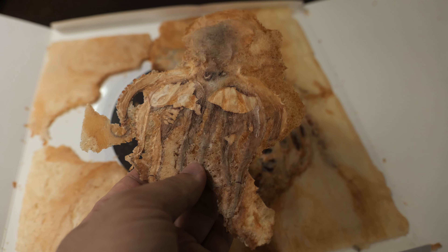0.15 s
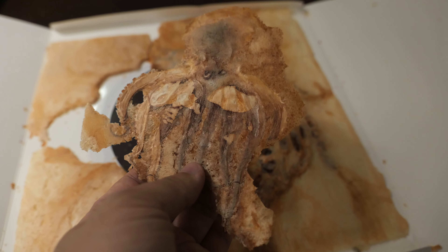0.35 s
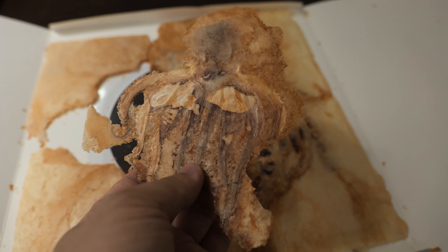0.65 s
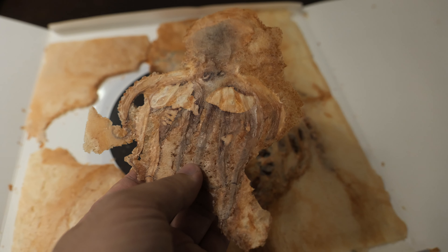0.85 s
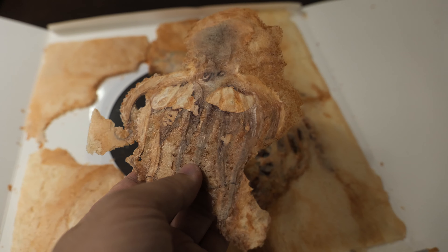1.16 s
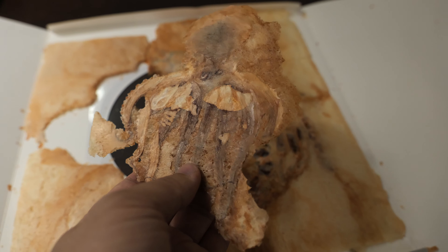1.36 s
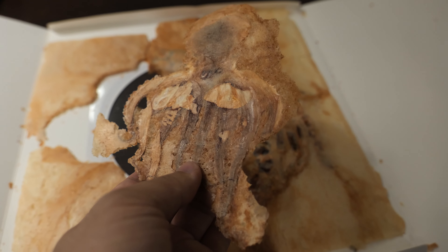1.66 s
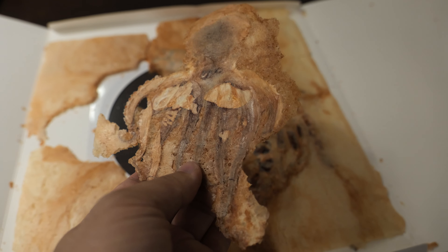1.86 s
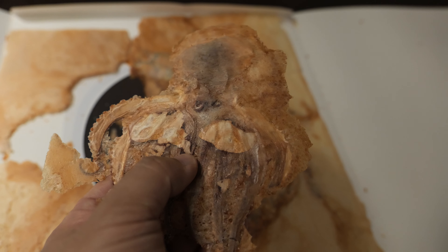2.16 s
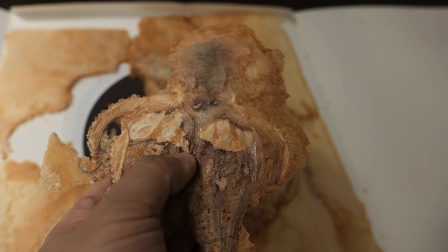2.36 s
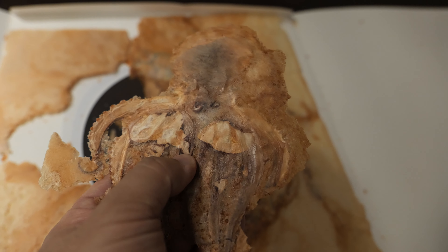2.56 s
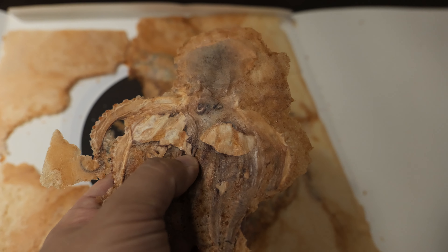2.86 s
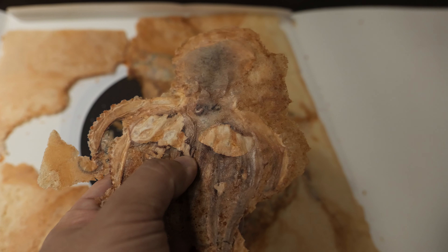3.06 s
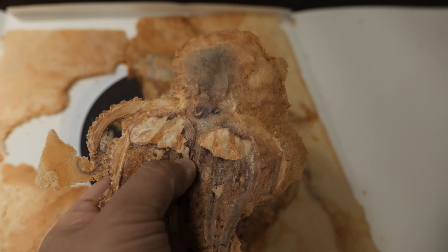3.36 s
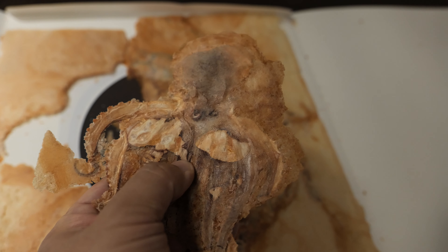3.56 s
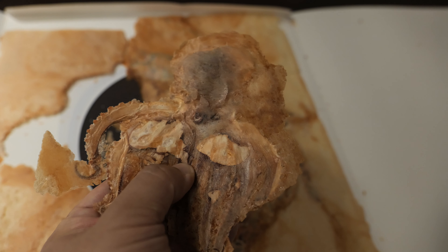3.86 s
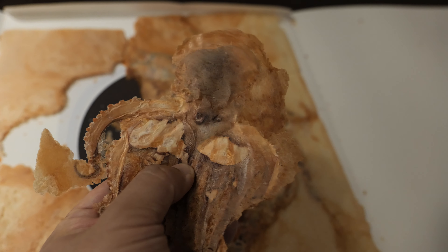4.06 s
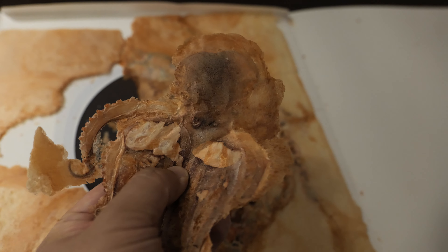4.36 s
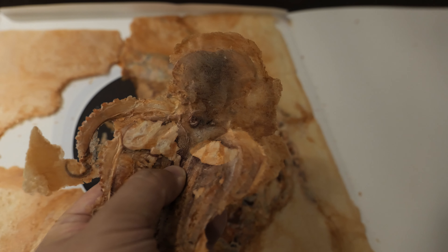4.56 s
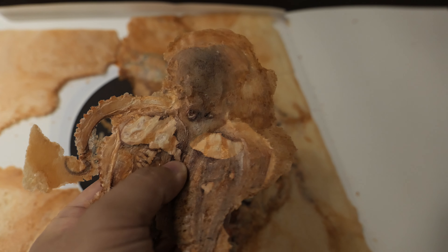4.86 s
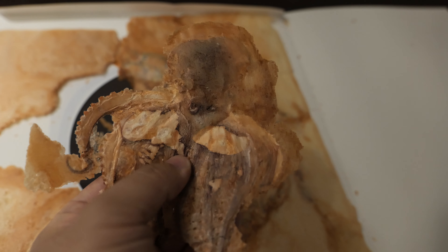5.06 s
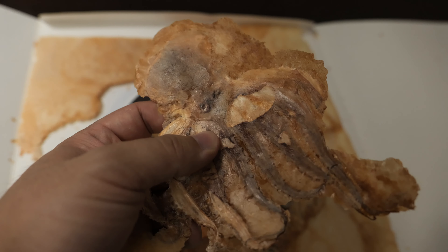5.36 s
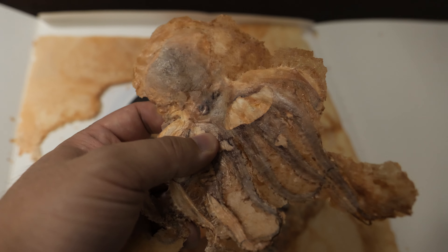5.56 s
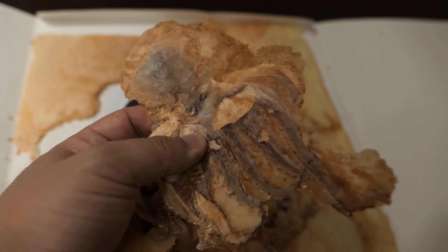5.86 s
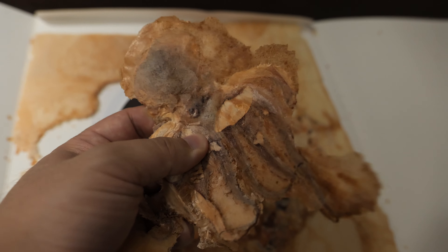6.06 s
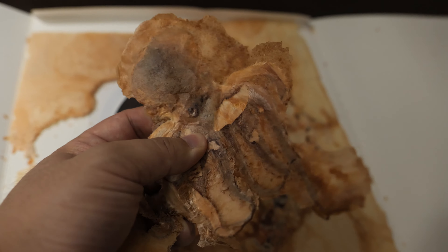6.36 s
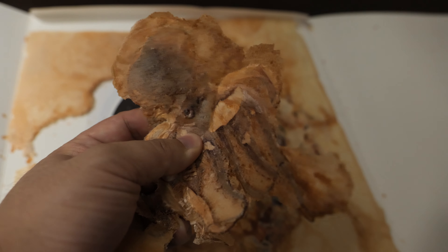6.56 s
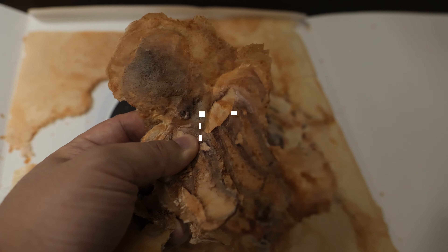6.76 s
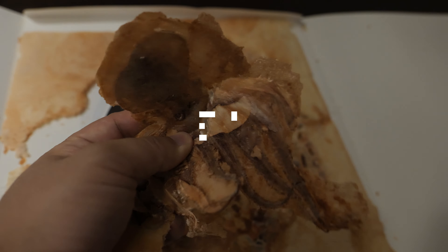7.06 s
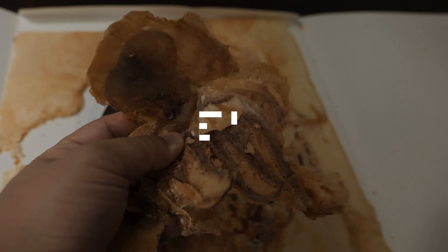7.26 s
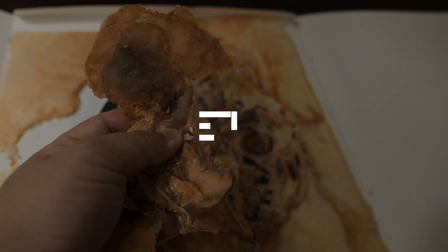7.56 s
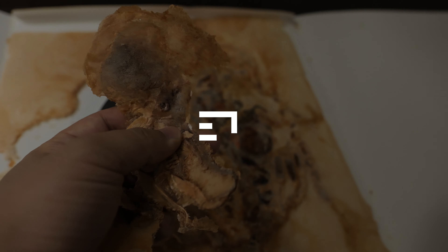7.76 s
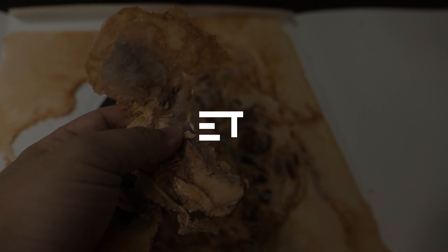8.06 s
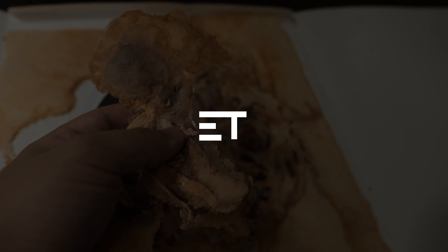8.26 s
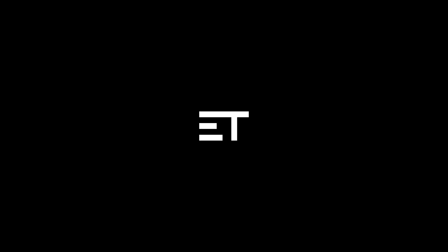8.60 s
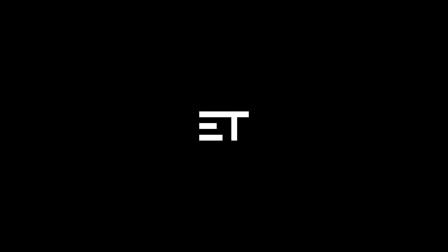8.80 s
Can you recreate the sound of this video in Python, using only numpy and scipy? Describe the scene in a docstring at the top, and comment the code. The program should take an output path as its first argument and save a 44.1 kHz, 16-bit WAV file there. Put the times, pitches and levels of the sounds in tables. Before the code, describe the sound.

Close dry crackles and sharp snaps as fingers break a crisp cracker; a piece clacks onto a tray, and the quiet room rumble fades.

```python
"""A thin, brittle seafood cracker is bent by hand close to a stereo microphone in a small room.
It ticks under the strain and splits in sharp snaps, built from short noise bursts coloured like a dry sheet.
A broken piece drops onto a tray with a clack and a hollow boom, made of fading sine waves.
Each snap and landing gets a short room echo, and skin and broken edges rustle as filtered noise.
Behind lie a rumble and a hum, which fade out at the end, and a faint whine, all made of filtered noise."""
import sys
import numpy as np
from scipy import signal
from scipy.fft import rfft, irfft, next_fast_len
from scipy.io import wavfile
from scipy.ndimage import uniform_filter1d

SR = 44100
rng = np.random.default_rng(int(sys.argv[2]) if len(sys.argv) > 2 else 0)


def file_out(sig):
    """Save sig as 16-bit WAV at sys.argv[1]."""
    # one column per channel
    cols = np.atleast_2d(sig).T
    # limit, then scale
    lim = np.clip(cols, -1, 1)
    pcm = np.round(lim * 32767).astype(np.int16)
    wavfile.write(sys.argv[1], SR, pcm)


N = 393857
TIME = np.arange(N) / SR

# The cracks that stand out. Each row: start in seconds, level in dB over 4 ms,
# lowest ringing pitch of the piece in Hz, brightness in dB per octave.
SNAPS = [(2.3888, -44, 1900, 2), (2.615, -58.5, 4800, -5), (2.8394, -46.5, 2500, -9.5),
         (3.1141, -51, 1410, 1), (3.4032, -45.5, 2600, -2), (3.5597, -47, 1323, 1.5),
         (3.6406, -31, 2030, -0.5), (3.6535, -35, 1330, -2), (3.6847, -31, 6650, -6.5),
         (3.6911, -23, 1262, 1.5), (3.6949, -26.5, 4340, -5), (3.8282, -51, 3250, -3.5),
         (3.9492, -45.5, 4140, -.5), (3.965, -46.5, 3920, -6), (3.9783, -24, 3530, -2),
         (3.9849, -31, 1320, 0.5), (4.074, -44.5, 1325, -1), (4.1263, -43, 2962, -6),
         (4.1553, -18.5, 3400, -1.5), (4.1754, -33.5, 2693, -5.5), (4.407, -52, 1780, 0.5),
         (4.6325, -55.5, 8000, -3), (4.821, -53.5, 2940, -3.5), (5.2143, -49.5, 1710, -2),
         (5.4725, -36, 2230, -1), (5.5937, -46.5, 1914, -3.5), (5.649, -53.5, 1310, 2.5),
         (5.7077, -56.5, 2196, -3), (5.83, -42.5, 8800, -1), (5.9638, -45, 1320, -1), (6.068, -46, 1410, 1),
         (6.0745, -38, 2387, -4), (6.1013, -10.5, 2250, -2.5), (6.1298, -33, 2500, 3),
         (6.2834, -37, 4460, 0.5), (6.3295, -34, 4770, 0.5), (6.3521, -32.5, 2073, 0),
         (6.459, -39.5, 8500, -4), (6.4746, -21, 1366, 2), (6.641, -24.5, 4442, 0.5),
         (6.668, -36.5, 6360, 5), (6.8463, -36.5, 8690, -2.5), (6.9325, -36.5, 2474, -3),
         (6.936, -17, 1269, 1.5), (6.9455, -18.5, 4600, -2.5), (6.9521, -27.5, 1800, 3.5),
         (6.9542, -13, 4680, -1), (7.1665, -54.5, 1460, -3.5), (7.8955, -54.5, 7000, 1)]
# Colour of a fracture in the dry sheet. Each row: frequency in Hz, level in dB.
SHEET_COLOUR = [(400, -5.5), (660, 4.5), (1050, 3), (1400, 0), (2100, 3), (3000, 2), (3900, 2), (5200, 0),
                (7400, 4.5), (10300, -2), (13500, -1), (16500, -12.5)]
# The sheet springs back in slow bending waves. Each row: frequency in Hz, level in dB,
# time to fall by 60 dB in seconds.
SHEET_BENDING = [(139, -38, 0.023), (441.5, -32.5, 0.014), (785, -25.5, 0.012)]
# The hand grips the sheet and bends it. Each row: start in seconds, end in seconds,
# level in dB around which its tiny fractures scatter.
HAND_BENDS = [(2.395, 2.486, -55), (2.747, 3.5, -63.5), (3.519, 4.244, -56), (5.482, 5.97, -58),
              (6.272, 6.943, -54.5)]
# The dropped piece lands and rocks. Each row: start in seconds, level in dB over 4 ms,
# ring of the piece in Hz, push on the tray in dB.
PIECE_LANDINGS = [(7.4527, -31, 1494, -61), (7.4595, -42, 1795, -65), (7.4789, -30.5, 2420, -51),
                  (7.7309, -48.5, 2117, -65.5)]
# Ringing of the tray. Each row: frequency in Hz, level in dB before the push is added,
# time to fall by 60 dB in seconds.
TRAY_MODES = [(187.5, 9, 0.28), (204, -9, 0.18), (263, -1, 0.13), (2590, -31, 0.25), (2780, -22, .22)]
# Colour of the room's answer. Each row: frequency in Hz, level in dB.
ROOM_TINT = [(700, 0), (2000, -5.5), (5000, 5), (15000, -1)]
# How long the room rings. Each row: frequency in Hz, time to fall by 60 dB in seconds.
ROOM_DECAY = [(1000, 0.24), (3000, 0.31), (6000, 0.2), (16000, 0.37)]
# Shape of the air rumble. Each row: frequency in Hz, relative level in dB per Hz.
RUMBLE_COLOUR = [(12, -31), (20, 3), (113, -8), (204, -14), (277, -20.5), (558, -23), (718, -29),
                 (1000, -28.5), (1710, -42), (2600, -44), (3160, -50.5), (14300, -60), (16000, -70.5)]
# Hum tones. Each row: frequency in Hz, rms level in dB before the shared boost, width in Hz.
HUM_TONES = [(159.7, -63.5, 7.4), (203.9, -64.5, 2.4), (379, -78.5, 5), (564.5, -81.5, 3.5)]
# Faint high whine. Each row: frequency in Hz, rms level in dB before swelling and sinking, width in Hz.
WHINE_TONES = [(2540, -89, 44), (3880, -95, 130)]
# How alike left and right are in sound from all sides. Each row: frequency in Hz, correlation from -1 to 1.
LEFT_RIGHT_LIKENESS = [(25, -0.89), (60, -0.52), (120, -0.35), (200, -0.0075), (400, 0.81), (1000, 0.69),
                       (2400, 0.56), (4400, -0.63), (8000, -0.21), (16000, -0.6)]

# A crack of the firm level runs for RUN_S; weaker ones creep, twice as long for each step down in level
FIRM_CRACK_DB, RUN_S, RUN_DOUBLES_DB = -25, .00045, 25.5
# A whole limb breaks off at this time
BREAK_S = 6.1015
# A bend takes hold and lets go within GRIP_S; a hard one breaks this many cells per second,
# twice as many for each step up in level
GRIP_S, HARD_BEND_DB, FRACTURES_PER_S, RATE_DOUBLES_DB = .03, -55, 105, 8
# Between bends the sheet still ticks faintly under the thumb
HOLD_FROM_S, HOLD_TO_S, HOLD_DB, HOLD_TICKS_PER_S = 2.03, 8.05, -68, 9.9
# Most tiny fractures are faint and a few are strong: the faintest against the bend's level,
# and the mean step above it (before the strongest are capped)
FAINTEST_DB, SIZE_SPREAD_DB = -9, 5.5
# Tiny fractures crowd around each crack: this many more per second at a firm one,
# twice as many for each step up in level, thinning out over SWARM_S on both sides
SWARM_PER_S, SWARM_DOUBLES_DB, SWARM_S = 170, 14, .02
RUMBLE_DB = -44
FADE_FROM_S, FADE_TO_S = 6.75, 8.58
WHINE_HOLD_S, WHINE_SINK_DB_PER_S = 4.3, 9
# Highest pitch that passes
CUTOFF_HZ = 16400


def snaps():
    """Cracks that can be picked out one by one: the stronger, the quicker, each with its own room echo."""
    out = np.zeros((2, N))
    for s, level_db, mode_hz, tilt_db in SNAPS:
        colour = sheet_colour(mode_hz, tilt_db)
        run_s = RUN_S * 2 ** ((FIRM_CRACK_DB - level_db) / RUN_DOUBLES_DB)
        add(out, burst_gain(level_db) * fracture(colour, run_s), s)
        add(out, burst_gain(level_db) * room(colour), s)
    return out


def fracture(colour, run_s, size=1024, run_db=0, rebound_s=0.001, rebound_db=-9,
             flutter_s=0.0046, flutter_db=-6, pan_db=-1, wander_db=1, lag_s=.000024):
    """One crack: a sudden release, a short run of breaking cells, a rebound from the edge, then a flutter."""
    t = np.arange(size) / SR
    hz = np.fft.rfftfreq(size, 1 / SR)
    # a longer run breaks more cells; run_db holds for half a millisecond
    cells = unit_energy(rng.laplace(size=size) * np.exp(-t / run_s))
    cells = cells * np.sqrt(run_s / .0005)
    # the -1 is a single downward click: the sudden release
    release = rfft(from_db(run_db) * cells) - 1
    delay_s = rebound_s * rng.uniform(0.74, 1.2)
    rebound = 1 + from_db(rebound_db) * np.exp(-2j * np.pi * hz * delay_s)
    # the many bending modes radiate partly differently towards each side of the microphone
    bending = rng.standard_normal(size) + 0.42 * rng.standard_normal((2, size))
    flutter = from_db(flutter_db) * rfft(unit_energy(bending * np.exp(-t / flutter_s)))
    # the right side is a little nearer, so the left hears it later
    arrival = np.exp(-2j * np.pi * hz * np.array([[lag_s], [0]]))
    top = 1 / (1 + (hz / CUTOFF_HZ) ** 24)
    sound = irfft((release * rebound + flutter) * causal(colour(hz)) * arrival * top)
    # below zero leans right
    lean_db = rng.normal(pan_db, wander_db)
    return unit_energy(sound * from_db(lean_db * np.array([[.5], [-.5]])))


def sheet_colour(mode_hz, tilt_db, mode_db=3.0, below_db=15, mode_octaves=0.25):
    """Spectrum of a piece: it rings at its lowest mode and radiates little below it."""
    def colour(hz):
        """Level in dB at these frequencies."""
        ratio = np.maximum(hz, 400) / mode_hz
        ring = mode_db / (1 + (np.log2(ratio) / mode_octaves) ** 2)
        weak = below_db / (1 + (1.325 * ratio) ** 6)
        tilt = tilt_db * np.log2(np.maximum(hz, 1000) / mode_hz)
        return at_hz(SHEET_COLOUR, hz) + tilt + ring - weak
    return colour


def burst_gain(db):
    """Gain that brings a sound of unit energy to a level taken over 4 ms."""
    return from_db(db) * np.sqrt(.004 * SR)


def spring_back():
    """The freed sheet flexes in fading low waves and gives the main snap its body."""
    out = np.zeros(N)
    t = TIME[:SR // 10]
    flex = sum(from_db(db - 60 * t / t60) * np.sin(2 * np.pi * hz * t) for hz, db, t60 in SHEET_BENDING)
    add(out, flex, BREAK_S)
    return out


def crackle(mode_hz=2600, tilt_db=0.86, run_s=0.00085, clump_s=0.04):
    """Single cells give way in flurries, more often and louder in harder bends, and crowd around cracks."""
    out = np.zeros((2, N))
    per_s, level_db = strain()
    swarm = np.zeros(N)
    for s, db, *_ in SNAPS:
        nearness = np.exp(-np.minimum(abs(TIME - s) / SWARM_S, 20))
        swarm += SWARM_PER_S * 2 ** ((db - FIRM_CRACK_DB) / SWARM_DOUBLES_DB) * nearness
    flurry = from_db(5 * slow_chance(clump_s))
    # each moment has a small chance of a tick
    for i in np.flatnonzero(rng.random(N) < (per_s * flurry + swarm) / SR):
        strength = min(rng.exponential(), 3)
        pitch, bright = np.clip(rng.standard_normal(2), -2, 2)
        colour = sheet_colour(mode_hz * 2 ** (.7 * pitch), tilt_db + 1.3 * bright)
        tick_db = level_db[i] + FAINTEST_DB + SIZE_SPREAD_DB * strength
        add(out, burst_gain(tick_db) * fracture(colour, run_s), TIME[i])
    # all ticks share one room answer to a plain click
    echo = signal.fftconvolve(out, room(np.zeros_like), axes=1)[:, :N]
    return fade() * (out + echo)


def strain():
    """Tiny fractures per second and their level in dB: the harder the bend, the more cells give way."""
    per_s = np.zeros(N)
    level_db = np.full(N, float(HOLD_DB))
    for start_s, end_s, bend_db in HAND_BENDS:
        grip = np.clip(np.minimum(TIME - start_s, end_s - TIME) / GRIP_S + .5, 0, 1)
        per_s += grip * FRACTURES_PER_S * 2 ** ((bend_db - HARD_BEND_DB) / RATE_DOUBLES_DB)
        level_db += grip * (bend_db - HOLD_DB)
    held = (TIME > HOLD_FROM_S) & (TIME < HOLD_TO_S)
    return per_s + held * HOLD_TICKS_PER_S, level_db


def rubbing(rub_db=-15, mode_hz=4000, tilt_db=1, uneven_db=4, uneven_s=0.047):
    """Skin and broken edges slide over the rough crust: a soft, uneven rustle that follows the strain."""
    per_s, level_db = strain()
    rustle_db = level_db + rub_db + uneven_db * slow_chance(uneven_s)
    effort = np.sqrt(per_s / FRACTURES_PER_S) * from_db(rustle_db)
    return fade() * effort * diffuse(sheet_colour(mode_hz, tilt_db), size=N)


def tray(tilt_db=-5.5, piece_db=8, contact_s=0.0019):
    """The loose piece clacks with a clearer, duller ring than the held sheet, and sets the tray booming."""
    out = np.zeros((2, N))
    t = TIME[:SR // 2]
    boom = sum(from_db(db - 60 * t / t60) * np.sin(2 * np.pi * hz * t) for hz, db, t60 in TRAY_MODES)
    for s, level_db, ring_hz, push_db in PIECE_LANDINGS:
        colour = sheet_colour(ring_hz, tilt_db, mode_db=piece_db)
        add(out, burst_gain(level_db) * fracture(colour, contact_s), s)
        add(out, burst_gain(level_db) * room(colour), s)
        add(out, from_db(push_db) * boom, s)
    return out


def room(colour, size=16384, tail_db=-14, build_s=.006, table_s=0.0036, table_db=-17, scatter_s=.0012):
    """Room's answer to a coloured click: a scattered table echo and a tail that dies band by band."""
    t = TIME[:size]
    hz = np.fft.rfftfreq(size, 1 / SR)
    centres = np.array(ROOM_DECAY)[:, 0]
    noise = diffuse(lambda f: colour(f) + at_hz(ROOM_TINT, f), size=size)
    spectrum = rfft(noise)
    tail = 0
    # each share picks out one band, blending into its neighbours
    for share, (_, t60) in zip(np.eye(len(centres)), ROOM_DECAY):
        band = irfft(spectrum * at_hz(np.c_[centres, share], hz))
        tail = tail + band * from_db(-60 * t / t60)
    tail = unit_energy(tail * (1 - np.exp(-(t / build_s) ** 2)))
    # the same noise backwards makes an echo unlike the tail
    echo_shape = (t > table_s) * np.exp(-abs(t - table_s) / scatter_s)
    echo = unit_energy(noise[:, ::-1] * echo_shape)
    return from_db(tail_db) * tail + from_db(table_db) * echo


def background(hum_db=3.5):
    """Air rumble and the wavering hum of an appliance, both noise shaped by pitch."""
    def air(hz):
        """Deep rumble is in opposite phase left and right, so it is stronger in each than in their sum."""
        alike = np.clip(at_hz(LEFT_RIGHT_LIKENESS, hz), -.95, 1)
        return at_hz(RUMBLE_COLOUR, hz) - 10 * np.log10(1 + alike)

    def lines(hz):
        """Narrow resonances of the motor and its housing."""
        return 10 * np.log10(sum(from_db(db) ** 2 / width / (1 + (2 * (hz - f) / width) ** 2) ** 2
                                 for f, db, width in HUM_TONES))

    hum_rms = np.sqrt(sum(from_db(db) ** 2 for _, db, _ in HUM_TONES))
    rumble = from_db(RUMBLE_DB) * diffuse(air, size=N)
    hum = from_db(hum_db) * hum_rms * diffuse(lines, size=N)
    # a little louder on the left
    return (rumble + hum) * fade() * from_db([[.8], [-.8]])


def whine(swell_db=4.0, swell_s=.2):
    """Two narrow, unsteady tones far behind swell together at random, hold on average, then sink."""
    tones = np.zeros((2, N))
    for centre_hz, db, width_hz in WHINE_TONES:
        def peak(hz):
            """A narrow peak around the tone, in dB."""
            return -20 * np.log10(1 + (2 * (hz - centre_hz) / width_hz) ** 2)
        tones += from_db(db) * diffuse(peak, size=N)
    sink_db = WHINE_SINK_DB_PER_S * np.maximum(TIME - WHINE_HOLD_S, 0)
    return tones * from_db(swell_db * slow_chance(swell_s) - sink_db)


def fade():
    """Gain that holds, then falls in a straight line to silence."""
    return np.clip((FADE_TO_S - TIME) / (FADE_TO_S - FADE_FROM_S), 0, 1)


def diffuse(colour, size):
    """Stereo noise arriving from all sides, with a colour in dB given as a function of Hz."""
    padded = next_fast_len(size, True)
    hz = np.fft.rfftfreq(padded, 1 / SR)
    mid, side = rfft(rng.standard_normal((2, padded)))
    alike = np.clip(at_hz(LEFT_RIGHT_LIKENESS, hz), -1, 1)
    pair = np.sqrt(1 + alike) * mid + np.sqrt(1 - alike) * side * [[1], [-1]]
    return rms_one(irfft(pair * from_db(colour(hz)), padded)[:, :size])


def slow_chance(span_s):
    """A random wander that changes over about this time; spread 1."""
    return rms_one(uniform_filter1d(rng.standard_normal(N), int(span_s * SR)))


def causal(gain_db):
    """Minimum-phase response for a dB curve: nothing sounds before the blow."""
    cepstrum = irfft(np.log(from_db(gain_db)))
    half = len(cepstrum) // 2
    # fold the backward half of time onto the forward half
    cepstrum[1:half] *= 2
    cepstrum[half + 1:] = 0
    return np.exp(rfft(cepstrum))


def from_db(db):
    """Decibels to gain."""
    return np.exp(np.asarray(db) * np.log(10) / 20)


def rms_one(x):
    """Scale to rms 1."""
    return x / np.sqrt(np.mean(x ** 2) + 1e-30)


def unit_energy(x):
    """Scale to energy 1 per channel, averaged over the channels."""
    return rms_one(x) / np.sqrt(x.shape[-1])


def at_hz(points, hz):
    """Read a spectrum on a log-frequency axis."""
    f, value = np.transpose(points)
    return np.interp(np.log(np.maximum(hz, 1)), np.log(f), value)


def add(out, sound, s):
    """Mix a sound in at time s, in seconds."""
    i = int(round(s * SR))
    out[..., i:i + sound.shape[-1]] += sound[..., :N - i]


def scene():
    """The cracker, the tray and the background together."""
    cracker = snaps() + spring_back() + crackle() + rubbing()
    return cracker + tray() + background() + whine()


def record(dry, top=.92):
    """The highest peaks are rounded and the top of the treble is cut."""
    rounded = top * np.tanh(dry / top)
    treble_cut = signal.cheby2(20, 80, CUTOFF_HZ + 700, fs=SR, output="sos")
    return signal.sosfilt(treble_cut, rounded)


dry = scene()
out = record(dry)
file_out(out)
```